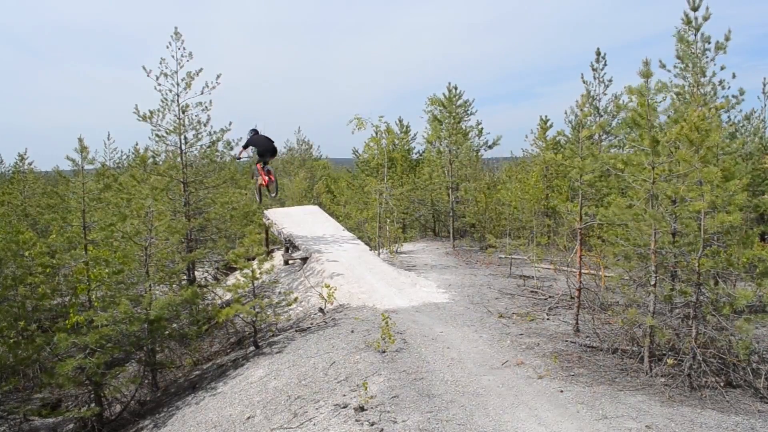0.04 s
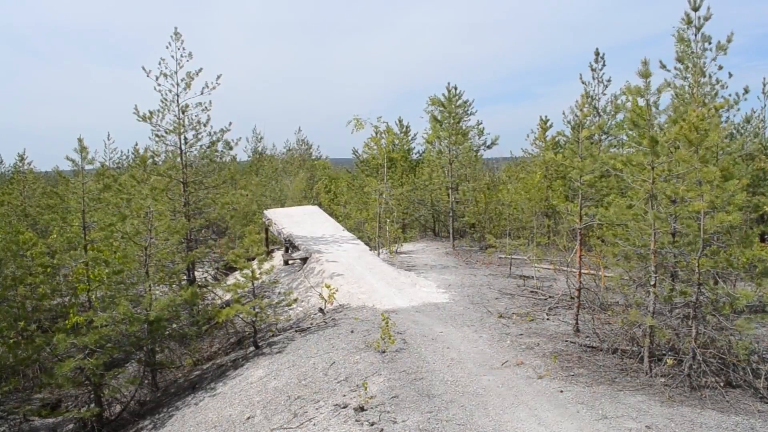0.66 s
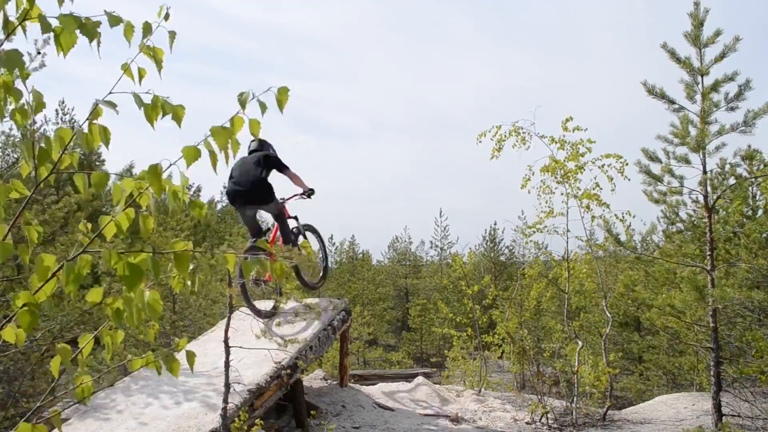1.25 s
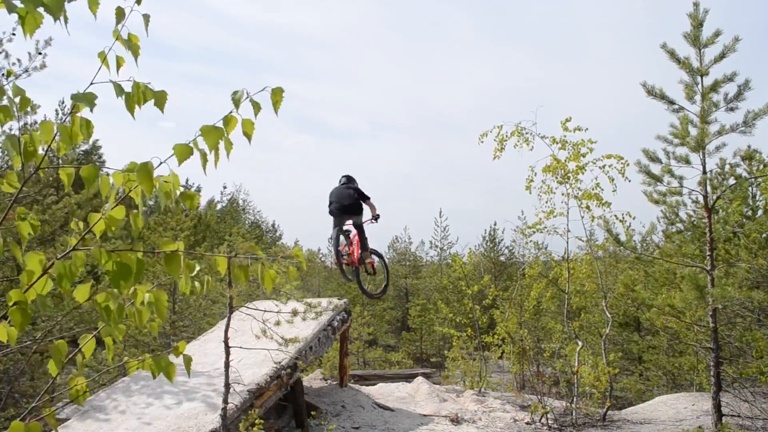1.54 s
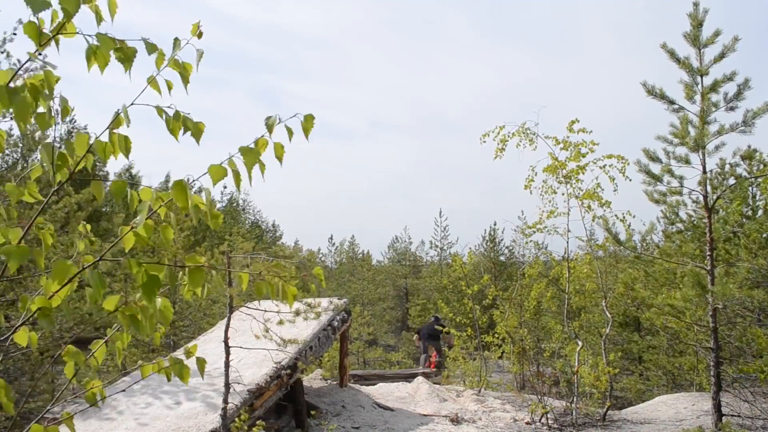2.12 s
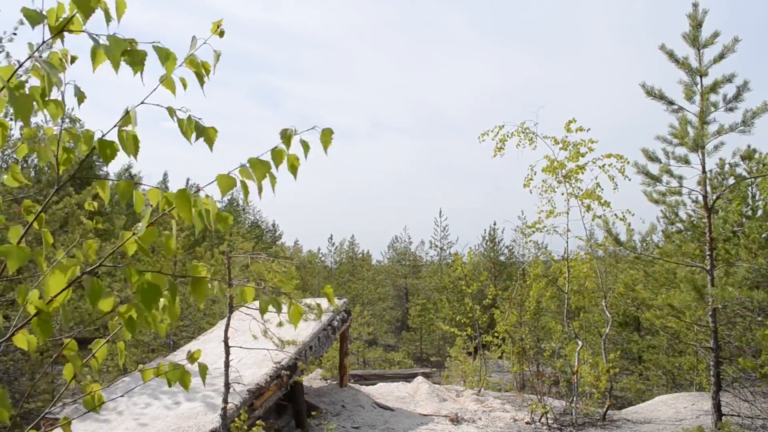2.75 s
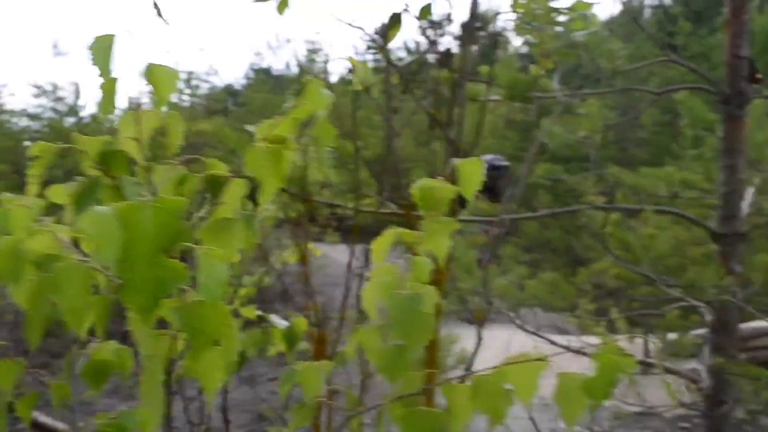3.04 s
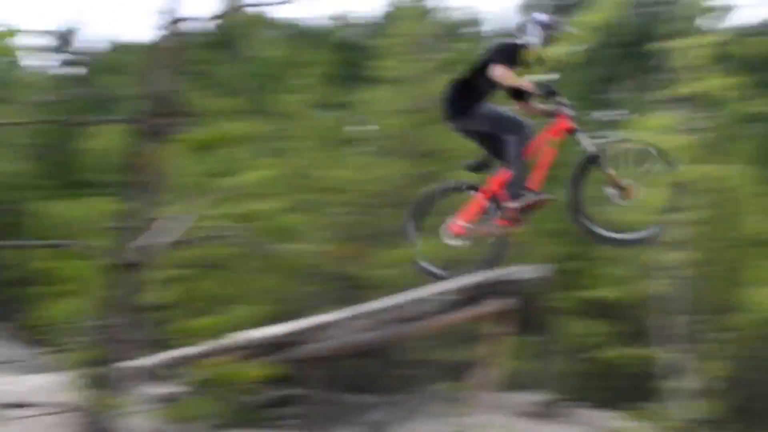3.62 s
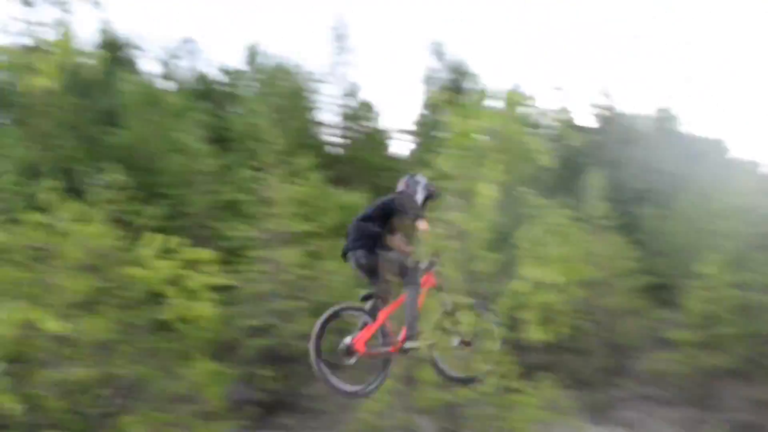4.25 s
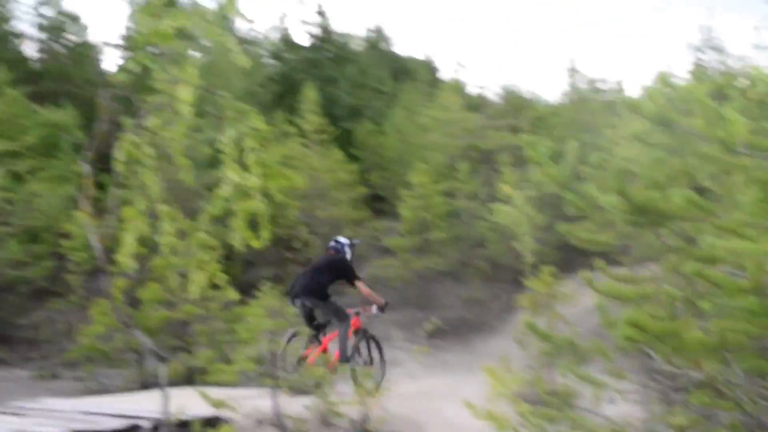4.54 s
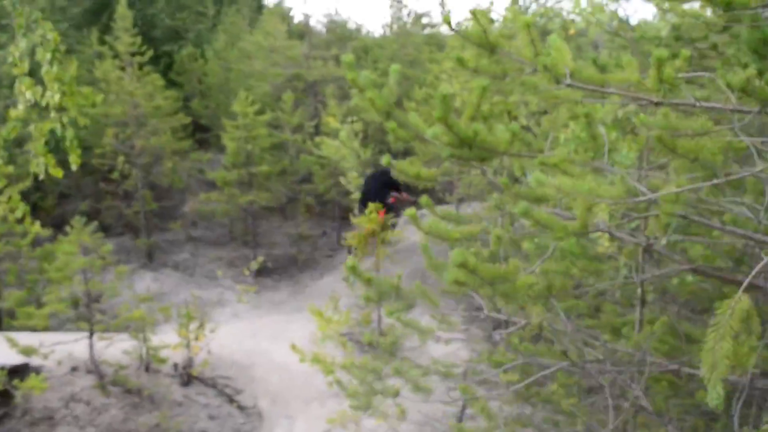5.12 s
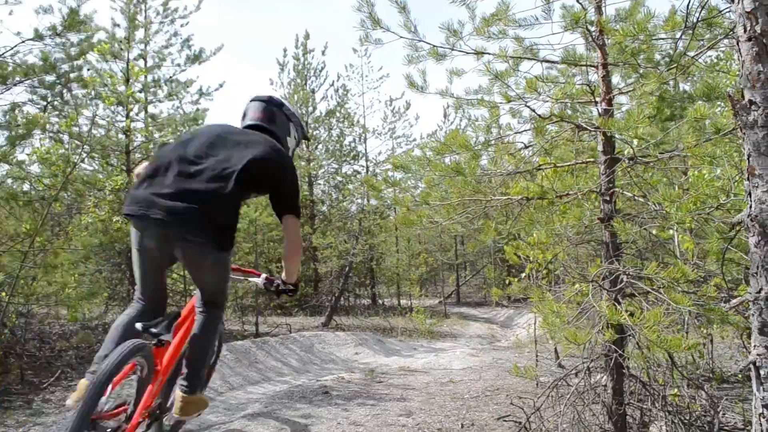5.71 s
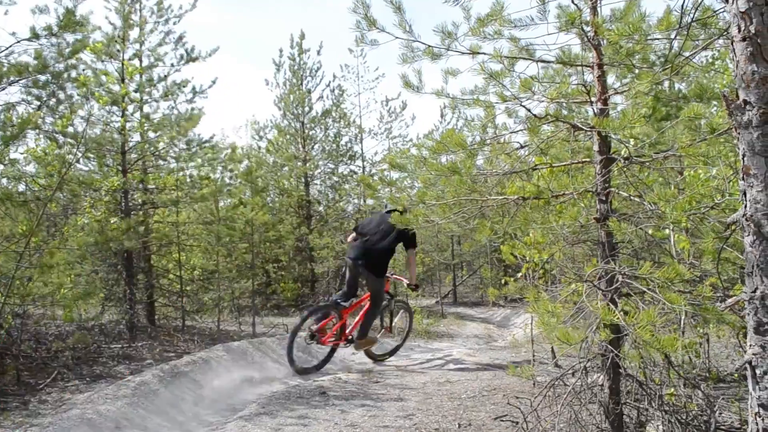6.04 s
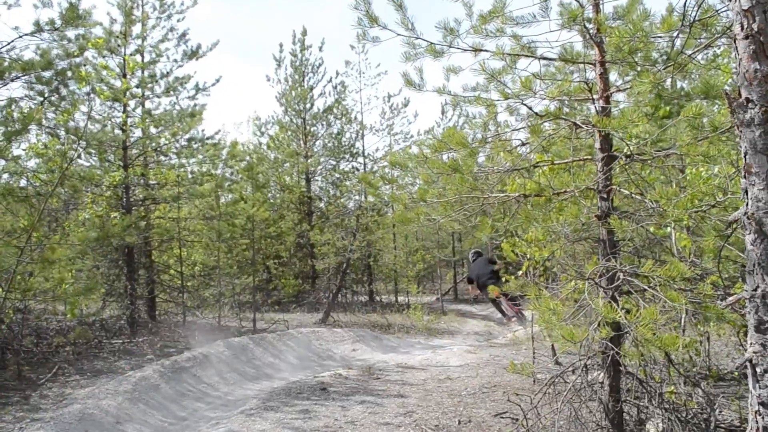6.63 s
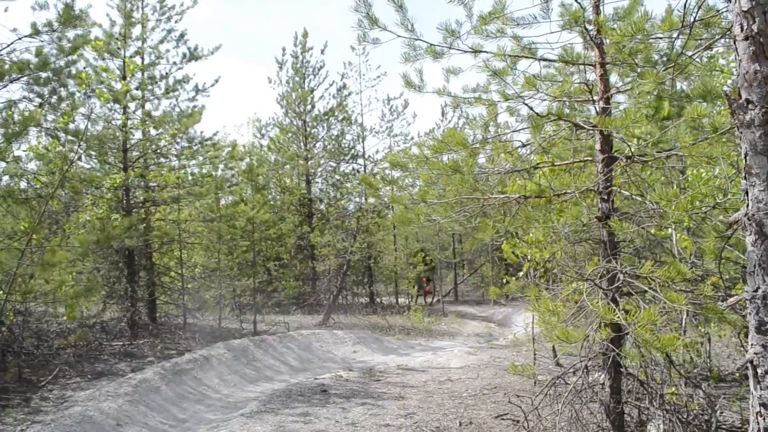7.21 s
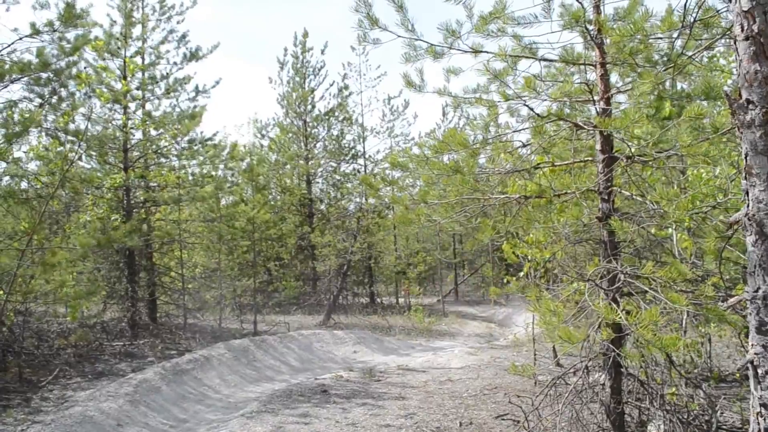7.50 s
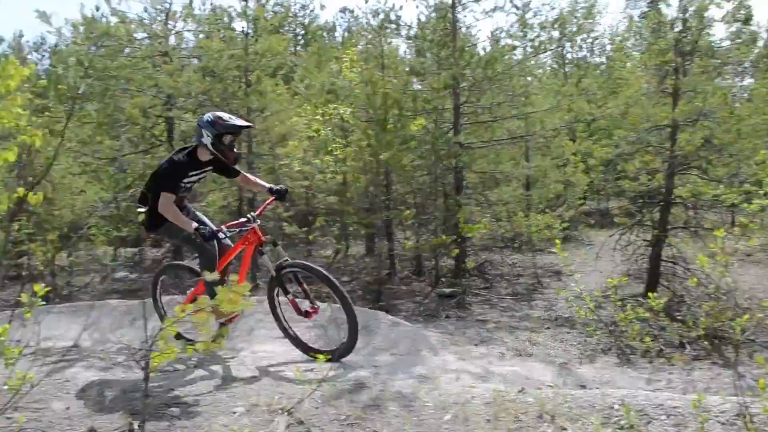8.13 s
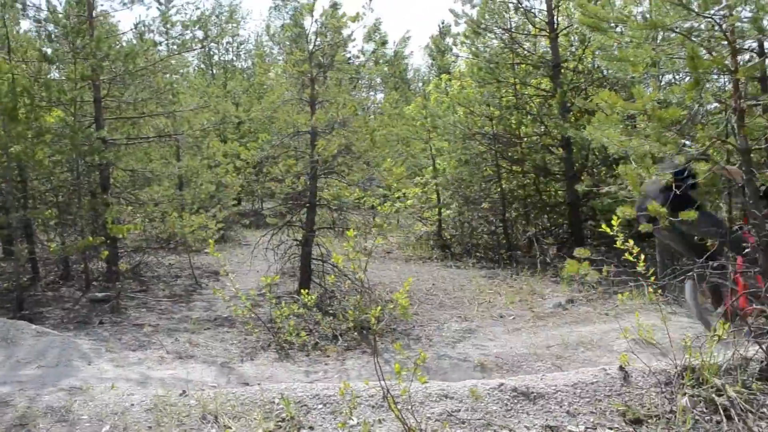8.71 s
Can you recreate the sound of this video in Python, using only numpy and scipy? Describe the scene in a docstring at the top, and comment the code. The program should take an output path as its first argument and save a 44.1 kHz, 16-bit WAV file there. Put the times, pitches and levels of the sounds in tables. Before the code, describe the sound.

Over a gentle forest breeze, bike tyres crunch and drum close by, snapping small stones, with a buzzing hub and sharp chain slaps. A distant landing thumps in sand as a bird chirps briefly. Next come knocks on wooden planks, a soft whoosh, a nearer landing and a few short skids. The bike then passes very close on hard dirt, fades away, and returns with loud knocks and more crunching.

```python
"""A mountain bike makes several passes through a pine forest; wind rustles throughout.
The freehub ticks, chain and tyres knock, wheels thump, and the tyres drum and crunch up a dusty ramp,
snapping stones and slipping briefly. A small bird twitters while the bike lands far off in sand.
The bike knocks over wooden planks, leaps a gap in a rush of air, lands close by and skids,
then rides a near berm, a far berm and rollers of hard dirt."""
import sys
import numpy as np
from scipy import signal
from scipy.fft import rfft, irfft, next_fast_len
from scipy.io import wavfile
from scipy.ndimage import map_coordinates

SR = 44100
rng = np.random.default_rng(int(sys.argv[2]) if len(sys.argv) > 2 else 0)


def file_out(sig):
    """Save sig as 16-bit WAV at sys.argv[1]."""
    # one column per channel
    cols = np.atleast_2d(sig).T
    # limit, then scale
    lim = np.clip(cols, -1, 1)
    pcm = np.round(lim * 32767).astype(np.int16)
    wavfile.write(sys.argv[1], SR, pcm)


N = 386316


def amp(db):
    """Decibels to gain."""
    return 10 ** (np.asarray(db) / 20)


def unit(x):
    """Scale to rms 1."""
    return x / np.sqrt(np.mean(x ** 2) + 1e-20)


def gain_at(spectrum, hz):
    """Gain of (frequency [Hz], level [dB]) points, interpolated on a log axis."""
    points_hz, points_db = np.transpose(spectrum)
    return amp(np.interp(np.log(hz + 1), np.log(points_hz + 1), points_db))


def level_at(envelope, t):
    """Level in dB of (time [s], level [dB]) points at times t."""
    return np.interp(t, *np.transpose(envelope))


def held(t, start_s, end_s, attack_s, release_s):
    """Rise from start, hold until end, then fade."""
    return np.clip(np.minimum((t - start_s) / attack_s, 1 - (t - end_s) / release_s), 0, 1)


def wobble(t, knots_per_s):
    """Smooth random curve, rms 1."""
    return unit(map_coordinates(rng.standard_normal(2048), [(t - t[0]) * knots_per_s], mode="wrap"))


def lowpass(hz, edge_hz):
    """Steep low-pass gain."""
    return 1 / (1 + (hz / edge_hz) ** 8)


def filtered(x, response):
    """Apply a frequency response."""
    size = next_fast_len(len(x) + 8192)
    return irfft(rfft(x, size) * response(np.fft.rfftfreq(size, 1 / SR)), size)[:len(x)]


def coloured(x, spectrum, size=4096):
    """Apply a minimum-phase filter of energy 1 with the given spectrum."""
    cepstrum = irfft(np.log(gain_at(spectrum, np.fft.rfftfreq(size, 1 / SR)) + 1e-6))
    cepstrum[1:size // 2] *= 2
    cepstrum[size // 2 + 1:] = 0
    kernel = irfft(np.exp(rfft(cepstrum)))
    return signal.fftconvolve(x, kernel / np.linalg.norm(kernel))[:len(x)]


def add(track, start_s, sound):
    """Mix a sound into the track."""
    part = track[max(round(start_s * SR), 0):][:len(sound)]
    part += sound[:len(part)]


# wind strength: (time [s], level [dB])
WIND_ENVELOPE = [(0, -47), (1.6, -46), (2.6, -45), (4.2, -49), (7.2, -43.5), (8.76, -45)]
# wind in the trees: (frequency [Hz], level [dB])
WIND_SPECTRUM = [(15, -38), (25, -17.5), (163, -9), (186, -11), (219, -5.5), (318, -6.5), (604, -4),
                 (749, -4.5), (833, -2.5), (2240, -9.5), (4620, -9), (6370, -16), (8780, -26.5),
                 (12100, -38), (15000, -43)]


def breeze(needles_db=-8):
    """Wind rushes softly in the pines; the needles add a finer hiss."""
    air = coloured(rng.standard_normal(N), WIND_SPECTRUM)
    rush = filtered(air, lambda hz: lowpass(hz, 3080))
    level_db = level_at(WIND_ENVELOPE, np.arange(N) / SR)
    return amp(level_db) * (unit(rush) + amp(needles_db) * unit(air - rush))


# hub resonances: (frequency [Hz], width [Hz], level [dB])
HUB_MODES = [(2566, 264, 9.5), (4710, 180, 5), (6850, 4500, -5), (8670, 160, 4.5), (9200, 400, -3.5),
             (14400, 2000, -17)]
# coasting passes:
# (start [s], length [s], nearest after [s], nearest level [dB], passing time [s], tick rate [Hz])
COASTING_PASSES = [(0, 0.82, 0.1, -53, 1, 88), (0.855, 1.26, 0.04, -31, 0.14, 100),
                   (3.151, 2.2, 0.55, -47.5, 0.79, 90), (5.528, 2.15, 0.069, -21.5, 0.064, 110),
                   (7.695, 0.66, 0.53, -39.5, 0.34, 103), (8.35, 0.24, 0.097, -33.5, 0.25, 80)]


def freehub(fall_db_per_decade=12.5, release_s=0.049):
    """Pawls drop over the ratchet and ring the hub as the bike coasts by."""
    def hub(hz):
        return sum((-1) ** k * amp(db) * 1j * hz * width_hz / (mode_hz**2 - hz**2 + 1j * hz * width_hz)
                   for k, (mode_hz, width_hz, db) in enumerate(HUB_MODES))

    track = np.zeros(N)
    for start_s, length_s, nearest_s, nearest_db, passing_s, tick_hz in COASTING_PASSES:
        t = np.arange(0, length_s + release_s, 1 / SR)
        distance_squared = 1 + ((t - nearest_s) / passing_s) ** 2
        level_db = nearest_db - fall_db_per_decade * np.log10(distance_squared)
        teeth = np.cumsum(tick_hz * (1 + 0.02 * wobble(t, 13))) / SR
        ticks = amp(-38 * (teeth % 1) + 1.8 * wobble(t, 90))
        scatter = np.minimum(amp(-0.7 * level_db - 50), 1)  # fills the gaps when far off
        ring = unit(filtered((ticks + scatter) * rng.standard_normal(len(t)), hub))
        add(track, start_s, amp(level_db) * held(t, 0, length_s, 0.005, release_s) * ring)
    return track


# chain slaps, gritty tyre strikes, plank knocks: (time [s], level [dB], ring [Hz], chatter t60 [s])
SHARP_KNOCKS = [(0.692, -26, 2290, 0.33), (0.895, -19.5, 2420, 0.16), (.996, -17.5, 2970, 0.019),
                (1.05, -10.5, 2650, 0.012), (2.109, -33.5, 2180, 0.095), (2.953, -29, 2240, .02),
                (2.988, -27, 1930, 0.029), (3.604, -23, 2700, 0.041), (3.684, -31, 2930, 0.093),
                (3.806, -39, 3600, .04), (4.353, -22.5, 2120, 0.041), (4.533, -16, 2230, 0.074),
                (4.544, -22.5, 2570, 0.23), (4.589, -20, 1820, 0.17), (5.185, -13, 2470, 0.014),
                (5.193, -17, 2950, 0.034), (5.319, -17, 2750, 0.085), (5.322, -17, 1540, 0.1),
                (5.714, -22, 2330, 0.057), (5.852, -10.5, 2450, 0.024), (6.157, -18, 1400, 0.01),
                (7.986, -13, 1190, 0.018), (8.021, -5.5, 2570, 0.02)]
# chatter of a knock: (frequency [Hz], level [dB])
KNOCK_SPECTRUM = [(100, -19), (300, -12.5), (650, 2), (900, -3), (1450, 1.5), (1850, -3), (2250, 2),
                  (2900, -1.5), (3600, -5.5), (4700, -11), (7000, -16.5), (9000, -19), (15000, -37)]


def sharp_knocks():
    """Chain slaps, gritty tyre strikes and plank knocks: each a dense chatter with a brief ring."""
    track, t = np.zeros(N), np.arange(SR // 5) / SR
    for start_s, db, ring_hz, t60_s in SHARP_KNOCKS:
        fade = amp(-60 * t / t60_s) * (1 - np.exp(-t / 0.00042))
        chatter = unit(coloured(fade * rng.standard_normal(len(t)), KNOCK_SPECTRUM)) * np.std(fade)
        ring = fade * amp(-60 * t / 0.031) * np.sin(2 * np.pi * ring_hz * t + 0.5 * wobble(t, 390))
        add(track, start_s, amp(db) * (0.85 * chatter + 1.7 * ring))
    return track


# wheel impacts: (time [s], level [dB], pitch [Hz], t60 [s])
WHEEL_IMPACTS = [(.695, -29, 308, 0.25), (.716, -25.5, 229, 0.26), (0.856, -23, 114.6, 0.29),
                 (2.122, -25, 254, 0.17), (2.134, -29, 135, 0.16), (3.25, -35, 252, 0.6),
                 (3.5, -22.5, 218, 0.097), (3.621, -20.5, 232, 0.041), (4.596, -24, 283, 0.078),
                 (4.645, -35, 240, 0.19), (6.28, -14.5, 550, 0.022), (7.986, -14, 710, 0.032)]
# ground response: (frequency [Hz], level [dB])
GROUND_SPECTRUM = [(30, -26), (65, -11), (115, -7), (280, 2), (500, -3), (800, -5.5), (1500, -11.5),
                   (3000, -23), (6000, -77)]


def wheel_thumps():
    """A landing tyre booms and shakes the ground."""
    track, t = np.zeros(N), np.arange(SR // 2) / SR
    for start_s, db, pitch_hz, t60_s in WHEEL_IMPACTS:
        fade = amp(-60 * t / t60_s) * (1 - np.exp(-t / 0.0027))
        thud = unit(coloured(fade * rng.standard_normal(len(t)), GROUND_SPECTRUM)) * np.std(fade)
        boom = fade * np.sin(2 * np.pi * pitch_hz * t + 1.2 * wobble(t, 74))
        add(track, start_s, amp(db) * (0.78 * thud + 0.38 * boom))
    return track


def grit(t, grains_per_s=2600, spread_db=3.4):
    """Knobs crush clumps of grit: sparse, unequal impulses over noise."""
    clumps = amp(0.6 * wobble(t, 25) + 0.8 * wobble(t, 70) + 1.4 * wobble(t, 300))
    present = rng.random(len(t)) < grains_per_s / SR
    size_db = spread_db * np.minimum(rng.exponential(size=len(t)), 4)
    grains = unit(present * amp(size_db) * rng.choice([-1, 1], len(t)))
    return clumps * (grains + 0.82 * rng.standard_normal(len(t)))


# rider loading and unloading the tyres: (time [s], half-width [s], drum gain [dB])
WEIGHT_SHIFTS = [(1.245, 0.022, 4.5), (2.145, 0.034, 8), (2.267, 0.022, 7), (2.975, 0.03, 4),
                 (3.24, 0.11, 3.5), (3.614, 0.02, 6.5), (4.67, 0.024, 5), (4.935, 0.12, 3),
                 (5.297, 0.096, -4.5), (5.98, 0.032, 7.5), (6.093, 0.028, 2), (6.674, 0.05, 1.5),
                 (6.86, 0.082, 6), (8.4, 0.083, -7.5), (8.72, 0.1, 1.5)]


def tyres(envelope, surface, crunch_db, drum_db, spray_db, cavity_db,
          drum_swing=1, spray_swing=1, spray_db_per_s=0):
    """The casing drums, grit crunches and fine sand sprays, all following the contact level."""
    def casing(hz):
        cavity = 1 + amp(cavity_db) / (1 + ((hz - 255) / 28) ** 2)  # air ring inside the tyre
        return np.sqrt(lowpass(hz, 620)) * cavity

    start_s, end_s = envelope[0][0], envelope[-1][0]
    t = start_s + np.arange(max(round((end_s - start_s) * SR), 2)) / SR
    grains = coloured(grit(t), surface)
    bumps = coloured(rng.standard_normal(len(t)), surface)
    drum = unit(filtered(bumps, casing))
    crunch = unit(filtered(grains, lambda hz: lowpass(hz, 3400) * np.sqrt(1 - lowpass(hz, 627))))
    spray = unit(filtered(grains, lambda hz: 1 - lowpass(hz, 3310)))

    level_db = level_at(envelope, t)
    mean_db = level_db.mean()
    swing_db = level_db - mean_db
    weight_db = sum(db * np.exp(-((t - at_s) / width_s) ** 2) for at_s, width_s, db in WEIGHT_SHIFTS)
    approach_db = spray_db_per_s * (t - t.mean())  # brighter nearing, duller leaving
    drum *= amp(mean_db + drum_db + drum_swing * swing_db + weight_db)
    crunch *= amp(level_db + crunch_db)
    spray *= amp(mean_db + spray_db + spray_swing * swing_db + approach_db)
    contact = np.clip(np.minimum(t - start_s, end_s + 0.002 - t) / 0.00081, 0, 1)
    track = np.zeros(N)
    add(track, start_s, contact * (drum + crunch + spray))
    return track


def receding(start_s, end_s, start_db, halving_s):
    """(time [s], level [dB]) of a bike riding away: amplitude falls as 1 / distance."""
    t = np.linspace(start_s, end_s, 32)
    return np.transpose([t, start_db - 20 * np.log10(1 + (t - start_s) / halving_s)])


# tyre contact on each stretch: (time [s], level [dB])
RAMP_ENVELOPE = [(0.856, -23), (0.9, -21.5), (0.96, -25.5), (1.12, -25.5), (1.2, -30), (1.25, -30),
                 (1.34, -33), (1.36, -39.5), (1.48, -51)]
PLANK_ENVELOPE = [(2.945, -33.5), (3.01, -33.0), (3.07, -33), (3.28, -29.0), (3.33, -33), (3.42, -32.5),
                  (3.61, -33.5), (3.66, -43)]
NEAR_BERM_ENVELOPE = [(5.527, -20), (5.58, -20.5), (5.695, -28.5), (5.725, -25.0), (5.78, -30.0),
                      (5.83, -26.5), (5.92, -28.5), (6.11, -23), (6.27, -42)]
FAR_BERM_ENVELOPE = [(6.27, -44.5), (6.5, -41.5), (6.58, -35), (6.75, -40), (6.99, -41.5), (7.06, -53.5)]
ROLLER_ENVELOPE = [(7.695, -37.5), (7.86, -37.5), (8.05, -25.0), (8.14, -27), (8.3, -34.0), (8.36, -32),
                   (8.42, -39.5), (8.64, -25.5), (8.76, -30.0)]
# trail surfaces: (frequency [Hz], level [dB])
RAMP_SPECTRUM = [(29, -51), (50, -24), (92, -12), (185, -10), (278, 1.5), (356, -9.5), (500, -1),
                 (701, -7.5), (940, -0.5), (1810, -5.5), (2650, -4.5), (4260, -16.5), (8980, -22.5),
                 (11000, -34), (14300, -64), (22000, -120)]
SAND_SPECTRUM = [(40, -23), (110, -11.5), (185, -11), (243, -0.5), (300, -7), (420, -7), (530, -3.5),
                 (850, -3), (1200, -1.5), (1750, -1.5), (2100, -6), (3000, -5), (3800, -17), (7000, -24.5),
                 (10000, -31.5), (15000, -44)]
PLANK_SPECTRUM = [(40, -28), (90, -14), (180, -11), (260, 1.5), (400, -4), (520, -1), (660, 4.5),
                  (1000, -3.5), (1750, -3), (2100, -6.5), (2800, -6), (4500, -20), (7000, -27),
                  (11000, -39.5), (15000, -50)]
HARD_DIRT_SPECTRUM = [(40, -32), (100, -16.5), (180, -9), (270, -3), (430, -2), (650, 0.5), (820, 2),
                      (1300, 4.5), (1900, 1.5), (2650, 2), (3300, -7.5), (4700, -13.5), (7000, -22),
                      (10000, -23), (15000, -36)]


def rolling():
    """The tyres roll over seven stretches of trail, each coloured by its surface."""
    far_landing = receding(2.108, 2.92, start_db=-38.5, halving_s=0.13)
    near_landing = receding(4.588, 5.39, start_db=-25.5, halving_s=0.14)
    track = tyres(RAMP_ENVELOPE, RAMP_SPECTRUM, crunch_db=-1.15, drum_db=-12, spray_db=-8.5,
                  cavity_db=-23, drum_swing=0.9, spray_swing=0.64, spray_db_per_s=-10)
    track += tyres(far_landing, SAND_SPECTRUM, crunch_db=-0.8, drum_db=-0.5, spray_db=-11.5,
                   cavity_db=-15, drum_swing=0.66, spray_swing=1.88)
    track += tyres(PLANK_ENVELOPE, PLANK_SPECTRUM, crunch_db=-1.2, drum_db=-8, spray_db=-6.5,
                   cavity_db=-2, drum_swing=0.7, spray_db_per_s=8)
    track += tyres(near_landing, SAND_SPECTRUM, crunch_db=-2, drum_db=-4.5, spray_db=-9,
                   cavity_db=-2, drum_swing=0.48)
    track += tyres(NEAR_BERM_ENVELOPE, HARD_DIRT_SPECTRUM, crunch_db=-1, drum_db=-8, spray_db=-10.5,
                   cavity_db=-4, drum_swing=1.1, spray_swing=0.66, spray_db_per_s=-17)
    track += tyres(FAR_BERM_ENVELOPE, HARD_DIRT_SPECTRUM, crunch_db=-0.5, drum_db=-6, spray_db=-14,
                   cavity_db=-9, drum_swing=1.5, spray_swing=0.6, spray_db_per_s=-20)
    track += tyres(ROLLER_ENVELOPE, HARD_DIRT_SPECTRUM, crunch_db=-1.3, drum_db=-6.5, spray_db=-8,
                   cavity_db=-5, drum_swing=0.93, spray_swing=0.52)
    return track


# stones under the tread: (time [s], relative level [dB])
STONE_HITS = [(0.8914, -5.5), (0.935, -11), (0.996, -11), (1.1486, -7.5), (1.189, -15), (1.303, -14),
              (1.323, -14), (1.3384, -16.5), (3.258, -12), (3.2933, -13.5), (3.558, -15), (5.6334, -17),
              (5.911, -13)]
# stone ring: (frequency [Hz], level [dB])
STONE_SPECTRUM = [(200, -14), (1000, -5), (2200, 5), (3000, 6), (3500, 4), (4100, -0.5), (5000, -8),
                  (9000, -21), (15000, -26)]


def stone_snaps():
    """Each stone gives one sharp snap and a tiny spill of splinters."""
    track, t = np.zeros(N), np.arange(SR // 50) / SR
    for start_s, db in STONE_HITS:
        snap = 0.08 * amp(-60 * t / 0.016) * rng.standard_normal(len(t))
        snap[0] = 1
        add(track, start_s, amp(db + 9) * snap)
    return coloured(track, STONE_SPECTRUM)


# tread slips: (time [s], rise [s], hold [s], level [dB])
TREAD_SLIPS = [(1.388, 0.013, 0.01, -37), (3.708, 0.011, 0.012, -34.5), (4.961, 0.043, 0.01, -31),
               (5.151, 0.029, 0.079, -28.5), (5.388, 0.012, 0.045, -23), (5.459, 0.015, 0.035, -24.5),
               (6.302, 0.017, 0.01, -37.5), (6.401, 0.024, 0.012, -38.5)]
# loose dirt: (frequency [Hz], level [dB])
LOOSE_DIRT_SPECTRUM = [(88, -63), (150, -26), (337, -4.5), (418, -21), (655, -0.5), (743, -16),
                       (812, -10.5), (1100, -9), (1230, -6), (1890, -11.5), (2260, -5), (3880, -18),
                       (4480, -15.5), (9190, -30.5), (11000, -32), (14300, -39), (22000, -120)]


def skids(release_s=0.038, sag_db=2.5, depth_db=16.5):
    """The tread breaks loose, scrapes with sagging force and grips again."""
    track = np.zeros(N)
    for start_s, rise_s, hold_s, db in TREAD_SLIPS:
        grip_s = start_s + rise_s + hold_s
        scrape = [(start_s, db - depth_db), (start_s + rise_s, db),
                  (grip_s, db - sag_db), (grip_s + release_s, db - depth_db)]
        track += tyres(scrape, LOOSE_DIRT_SPECTRUM, crunch_db=1, drum_db=-13.5, spray_db=-9,
                       cavity_db=-17)
    return track


# whistles gliding down, up, down: (delay [s], level [dB], length [s], start [Hz], end [Hz])
BIRD_NOTES = [(0, -4, 0.032, 3850, 3500), (0.033, -2, 0.039, 2600, 4030), (0.082, -0.5, 0.028, 3450, 2750)]
# repeats of the phrase: (time [s], level [dB])
BIRD_PHRASES = [(1.514, -40.5), (1.708, -39), (1.9, -40.5), (2.288, -41), (2.595, -44.5)]


def bird():
    """A quick, slightly hoarse phrase of whistles, varied each time and scattered by the trees."""
    track = np.zeros(N)
    for start_s, phrase_db in BIRD_PHRASES:
        for delay_s, note_db, length_s, start_hz, end_hz in BIRD_NOTES:
            progress = np.linspace(0, 1, round(length_s * SR))
            glide_hz = start_hz + (end_hz - start_hz) * progress
            detune = 0.012 * rng.normal()
            rasp = 0.028 * wobble(progress * length_s, 700)
            whistle = np.sin(2 * np.pi * np.cumsum(glide_hz * (1 + detune + rasp)) / SR)
            add(track, start_s + delay_s, amp(phrase_db + note_db) * np.sin(np.pi * progress) * whistle)
    return amp(-0.5) * track + amp(3) * forest_tail(track, t60_s=0.24)


# air past the wheels: (frequency [Hz], level [dB])
LEAP_SPECTRUM = [(30, -16), (120, -10), (230, -14), (330, -3), (520, -4), (650, 1), (770, -2.5),
                 (1000, -1.5), (1600, -8.5), (2100, -12.5), (2700, -22), (3600, -36), (15000, -54)]


def leap(level_db=-39):
    """Over the gap, air rushes through knobs and spokes."""
    t = np.arange(N) / SR
    airborne = held(t, start_s=3.58, end_s=4.52, attack_s=0.094, release_s=0.19)
    flutter_db = 0.45 * wobble(t, 25.2)
    return airborne * amp(level_db + flutter_db) * coloured(rng.standard_normal(N), LEAP_SPECTRUM)


def forest_tail(x, t60_s):
    """Trunks scatter a thin, bright tail."""
    t = np.arange(SR // 2) / SR
    fade = amp(-60 * t / t60_s) * (1 - np.exp(-t / 0.0034))
    tail = coloured(fade * rng.standard_normal(len(t)), [(200, -16), (3000, -18.5), (10000, -8)])
    return signal.fftconvolve(x, tail / np.linalg.norm(tail))[:N]


def scene():
    """Bike, forest tail, bird and wind, in mono."""
    bike = freehub() + sharp_knocks() + stone_snaps() + wheel_thumps() + leap() + skids() + rolling()
    return (bike + amp(-11) * forest_tail(bike, t60_s=0.21) + bird() + breeze())[None]


# microphone treble notches: (frequency [Hz], gain [dB])
MIC_RESPONSE = [(7300, -0.5), (7900, -5), (8300, 1), (9900, -0.5), (11000, -10.5), (12000, -27),
                (12900, -16), (14400, -8), (15800, -11)]
BAND_LIMIT_HZ = 15850


def record(dry):
    """The microphone notches the treble; nothing passes above the band limit."""
    return filtered(dry[0], lambda hz: gain_at(MIC_RESPONSE, hz) * (hz < BAND_LIMIT_HZ))[None]


dry = scene()
out = record(dry)
file_out(out)
```